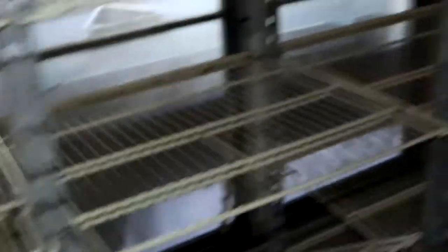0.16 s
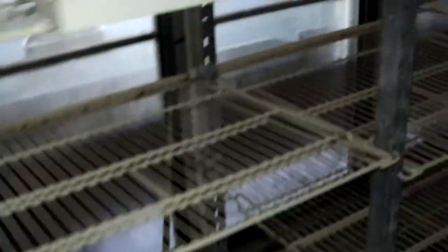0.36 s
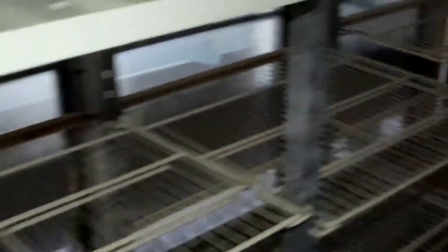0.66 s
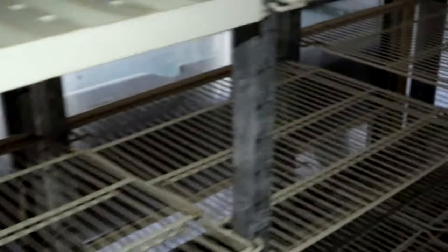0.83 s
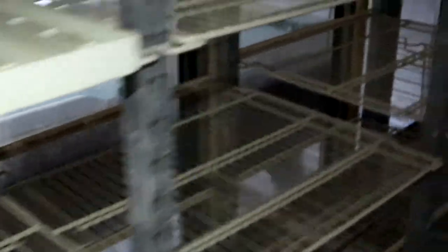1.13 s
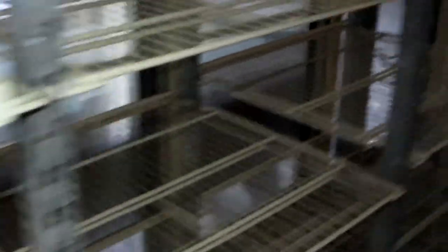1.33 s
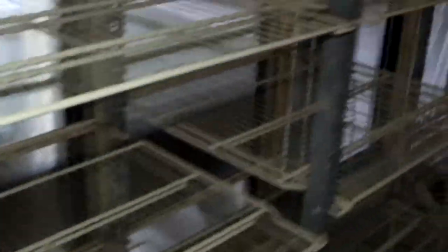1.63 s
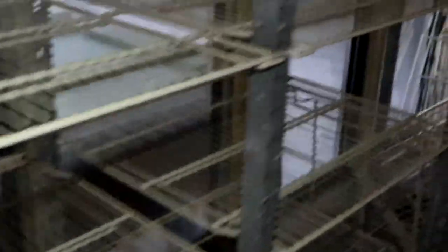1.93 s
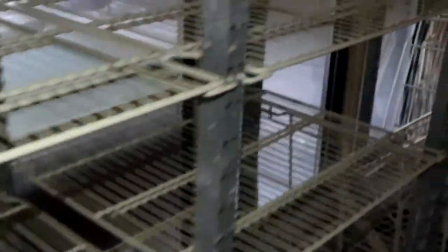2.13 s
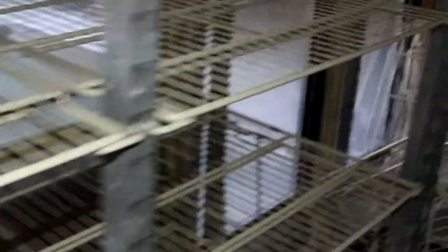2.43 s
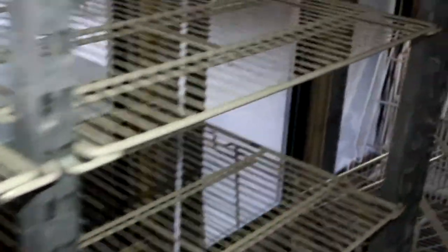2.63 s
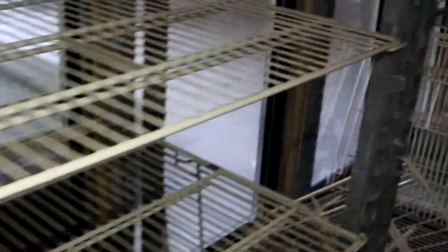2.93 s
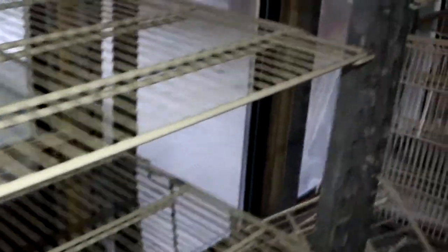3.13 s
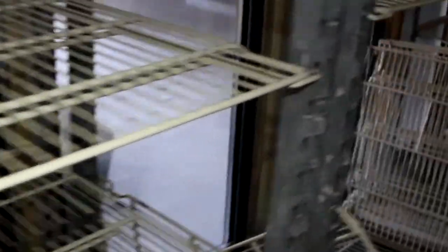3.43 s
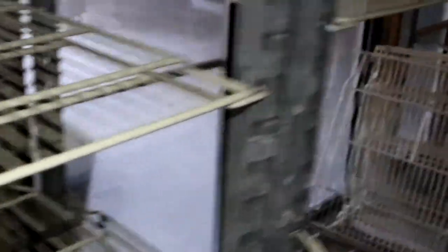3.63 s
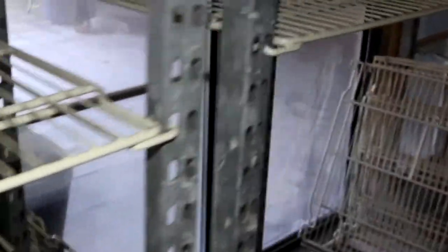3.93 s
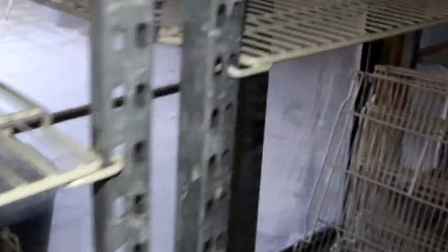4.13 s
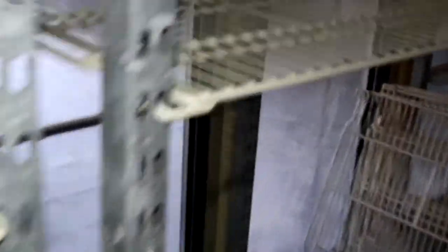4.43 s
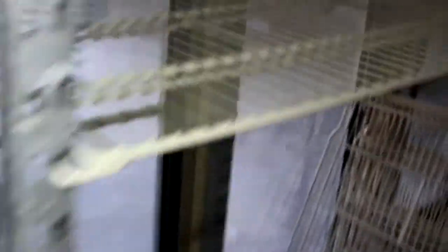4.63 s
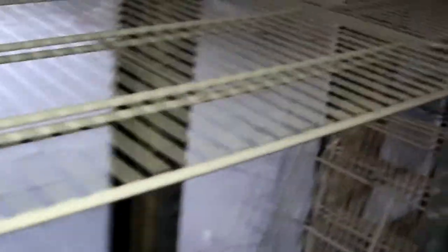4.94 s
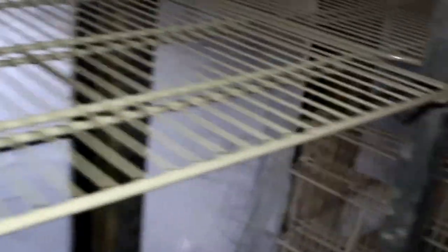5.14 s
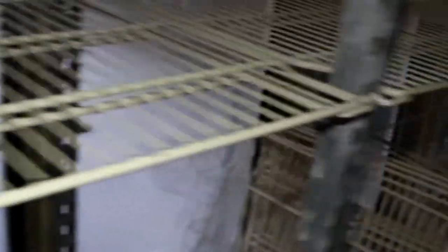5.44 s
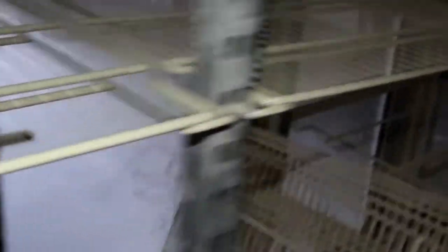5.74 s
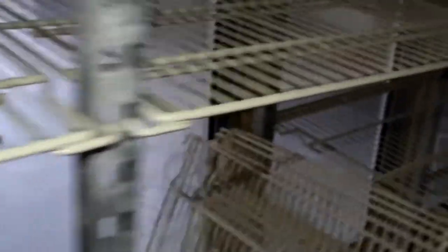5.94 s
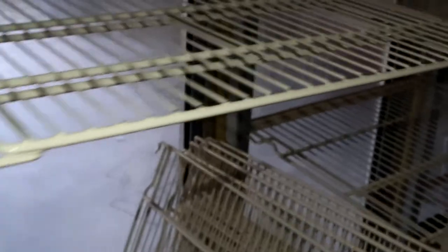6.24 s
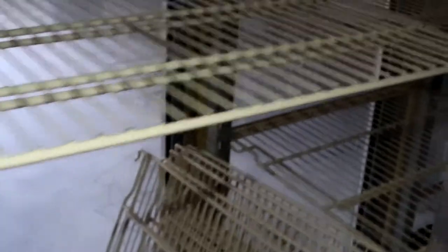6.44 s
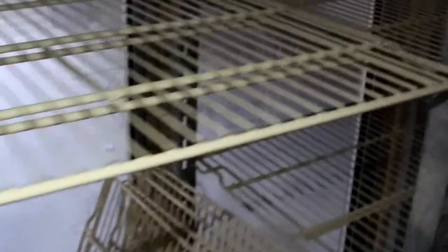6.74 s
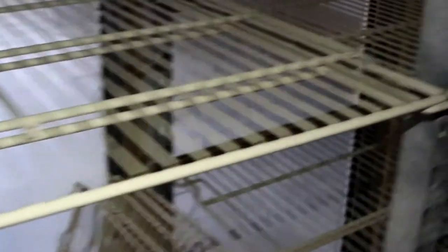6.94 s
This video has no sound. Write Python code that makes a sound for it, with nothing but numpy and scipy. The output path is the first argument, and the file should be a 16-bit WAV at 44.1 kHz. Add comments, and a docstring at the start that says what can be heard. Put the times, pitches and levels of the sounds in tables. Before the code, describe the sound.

Slow footsteps crunch and scuff over brittle, gritty debris in a bare, hard-walled empty building, with sharp cracks close by and a faint low hum.

```python
"""Seven seconds in a bare, empty building: slow steps over gritty debris, heard by two close camera ports.
Brittle scraps crack at once, hardest near 0.4 s, then after a lull at 1.5 s, and again at 2.1 s.
Lighter cracks and long scuffs follow; the hardest cracks come at 4.3 to 4.7 s, as the low hum sinks away.
One more sharp crack at 5.5 s, the hum back by 6 s, then a last cluster of cracks from 6.3 s.
Filtered runs of snaps make the cracks, noise grains the grit, decaying taps the hard room around both."""
import sys
import numpy as np
from scipy import signal
from scipy.io import wavfile
from scipy.ndimage import uniform_filter1d

SR = 44100
rng = np.random.default_rng(int(sys.argv[2]) if len(sys.argv) > 2 else 0)


def persist_wave(psi):
    """Save psi, clipped to +-1, as 16-bit WAV."""
    counts = np.round(np.clip(psi, -1, 1) * 32767).astype(np.int16)
    wavfile.write(sys.argv[1], SR, np.atleast_2d(counts).T)


N = 312228

# Room air and microphone hiss, relative spectrum: pitch_hz [Hz], level_db [dB]
AIR_SPECTRUM = [(8.8, 2), (15, -16), (48, 7.5), (109, 0.5), (340, 2.5), (1090, -10), (2860, -19),
                (6290, -30), (8180, -78), (11000, -40), (16000, -92)]
# Low hum in the building, rms of its two channels: time_s [s], level_db [dB]
HUM_LEVEL = [(0.0, -59), (0.14, -52), (0.27, -51), (0.63, -55.5), (1.08, -51), (1.63, -61), (1.87, -53.5),
             (4.2, -59), (4.49, -77), (5.82, -77), (6.05, -57.5), (7.08, -57)]
# Decay of the hard room: pitch_hz [Hz], t60_s [s], relative return_db [dB]
ROOM_DECAY = [(199, 0.19, -4), (520, 0.43, -0.5), (875, 0.4, -9.5), (1730, 0.47, -1.5), (2400, 0.48, 0.5),
              (3700, 0.44, 2.5), (6470, 0.33, 1.5), (11800, 0.21, -3.5)]
# Soft footfalls felt through the floor and the hand: start_s [s], relative level_db [dB], pitch_hz [Hz]
FOOTFALLS = [(0.398, -47, 60), (1.262, -55, 44.5), (2.264, -54.5, 83.4), (2.604, -47, 160),
             (2.781, -47, 117), (2.94, -51, 73), (3.096, -47.5, 163), (3.269, -45.5, 86),
             (3.419, -49, 68.6), (3.589, -52, 83.4), (3.815, -56, 107), (4.058, -48, 45.6),
             (4.135, -42.5, 88), (4.518, -44, 65.6), (5.605, -50, 68.5), (6.701, -47.5, 53.8)]
# Relative spectrum of grit underfoot: pitch_hz [Hz], level_db [dB]
GRIT_SPECTRUM = [(59, -58), (200, -10), (320, -4.5), (450, -7.5), (736, -7), (872, -1.5), (991, -1.5),
                 (1390, -3), (8640, -32.5), (13200, -62), (16000, -56)]
# Soles dragged over grit: start_s [s], hold_s [s], relative pressure_db [dB], first_pitch_hz [Hz],
# last_pitch_hz [Hz], scrape_ring_db [dB], sole_bass_db [dB], fine_grit_treble_db [dB]
DRAGS = [(0.075, 0.045, -44.5, 2120, 1590, 8, 5, 5), (0.367, 0.032, -31, 1200, 1820, -4, 6.5, 10),
         (0.407, 0.12, -35, 2050, 2060, -24, -12, 8.5), (0.59, 0.075, -55.5, 1800, 1400, 3, 19, 23),
         (0.657, 0.02, -45.5, 800, 1740, 13.5, 11, -1), (1.013, 0.067, -56, 1200, 900, -6, 13, -10),
         (1.301, 0.052, -44.5, 1300, 1500, -4, 1, 4), (1.386, 0.044, -26.5, 2000, 1670, 3.5, -16, 9),
         (1.523, 0.089, -42, 1300, 1250, 0, -34, 16), (2.038, 0.1, -42, 1160, 1200, 3, 1, 0),
         (2.138, 0.1, -32, 1190, 1440, 10, -10, 11), (2.226, .06, -50, 3600, 3500, 5, -3, 3),
         (2.292, 0.085, -39, 1400, 1600, 8, -3, 19), (2.363, 0.049, -40, 2000, 2360, 14.5, 3, 23.5),
         (2.485, 0.25, -45, 2320, 1190, 3.5, 10, 6), (2.797, 0.15, -52, 2420, 1920, 13, 15.5, 19.5),
         (3.087, 0.087, -43.5, 1160, 1500, 11, 3, 16.5), (3.19, 0.14, -46, 1300, 1700, 10, -9, 19.5),
         (3.382, 0.26, -41.5, 2300, 1900, 4, 3.5, 16.5), (3.592, 0.29, -40.5, 1160, 1710, -2, -33, 5),
         (3.765, 0.041, -38, 1000, 1180, 6, 5, 1), (3.841, 0.067, -44.5, 1100, 1300, 1, 8.5, 16.5),
         (4.02, 0.19, -49, 1400, 900, -3.5, 13.5, 6), (4.223, 0.12, -44.5, 1400, 1440, 3, 7, 15),
         (4.353, 0.05, -33, 1500, 2280, 8, -14, 13), (4.482, 0.023, -35.5, 850, 950, 18, -7, -5),
         (4.522, 0.08, -28, 1430, 1350, 4, -6.5, 6), (4.588, 0.075, -35.5, 2100, 1500, 11.5, -16, 10),
         (4.724, 0.011, -25, 1300, 1200, 13, -6, 14.5), (4.75, 0.061, -40, 3300, 3800, 9, -11, -1),
         (4.903, 0.12, -47, 1110, 2180, 4, 5, 8.5), (5.16, 0.048, -50.5, 970, 970, 1, 7, -13),
         (5.456, 0.074, -39.5, 3370, 3450, 12, -30, 8), (5.47, 0.044, -45, 1600, 1850, 14, -15, 2),
         (5.566, 0.1, -50.5, 1160, 1190, 7.5, 6, 16), (5.826, 0.1, -50, 3220, 2340, 11.5, 11.5, 15.5),
         (6.056, 0.31, -54.5, 1920, 1880, -13, 15, 2), (6.312, 0.043, -41, 1000, 895, 3, 7, -3),
         (6.353, 0.074, -39, 800, 990, 12, 9, -19), (6.343, 0.07, -56, 3500, 3200, 0, 0, -8),
         (6.393, 0.037, -42, 1050, 1530, 8.5, 8, -12), (6.689, 0.02, -39, 1900, 2400, 10, 4, 2),
         (6.742, 0.11, -41.5, 3400, 2150, -1, 8, 15), (6.931, 0.13, -50.5, 2900, 2360, 10.5, 17, 8)]
# Relative spectrum common to all cracks: pitch_hz [Hz], level_db [dB]
CRACK_SPECTRUM = [(60, -58), (150, -8), (300, 5), (420, 0.5), (700, 5), (1360, 2), (2000, -1.5),
                  (3600, -10.5), (5000, -16), (7140, -18), (10000, -27.5), (13000, -40), (16000, -71)]
# Scraps breaking under a sole: start_s [s], relative level_db [dB], body_pitch_hz [Hz], body_ring_db [dB],
# bass_db [dB], edge_db near 3.6 kHz [dB], treble_db [dB], room_share_db [dB],
# first_break_db against the unscaled snaps [dB], snapping_ms [ms]
SCRAPS = [(0.029, -43.5, 3370, 11, -5, 9, 19, 0, 17, 9.5), (0.085, -29.5, 1120, 7, -12, -8, -2, -14, 0, 9),
          (0.095, -25, 1290, 11.5, -16, 2.5, -2, -6, 13, 16),
          (0.38, -18.5, 1350, 9, -1, 1, -2, 4, 12, 12.6),
          (0.417, -9, 1330, 2.5, -12, 3.5, -12.5, -2, 12, 8.3),
          (0.633, -33.5, 1290, 6, -19, 15, 20, -1.5, 11, 9.8),
          (0.668, -32.5, 850, 11, -6, -5, -7, -5, 3, 14),
          (0.679, -23.5, 1330, 17, -3.5, 4, -3, -4, -1, 9.5), (1.352, -27, 2520, 4, -3, 13, 5, -6, 7, 8),
          (1.361, -25.5, 1020, 5, -33, -2, -11, -0.5, 11, 15),
          (1.389, -21, 597, 8.5, 11, 10, 10.5, -3.5, 23, 10),
          (1.407, -22.5, 2000, -1, -27, 11, 4, 0, 13, 11),
          (1.456, -7, 1120, 9, -49, 8.5, -2.5, -4, 11, 11.8),
          (1.544, -13.5, 1074, 15.5, -30, 4.5, 0, -1.5, 18.5, 13),
          (1.554, -14, 1410, 12, -18, 0, -9, -2, 4, 3.7),
          (2.024, -30.5, 850, 12, -18, -4, -12, -1.5, 10.5, 10.3),
          (2.083, -32.5, 830, 18.5, -3, -3, 0, 9, 8, 8.3),
          (2.134, -7, 1160, 9, -16.5, -13, -10, -0.5, 11.5, 9),
          (2.145, -8, 1410, 18, -27, -11, -19, -5.5, 5, 4.2),
          (2.187, -16, 1330, 11, -18, -6, 3.5, -1, -1, 16),
          (2.22, -20.5, 1160, -13, -25, 9, -6, -2, 0, 12.5),
          (2.275, -16.5, 1420, 9.5, 0, 7, 16.5, 1, 10, 10),
          (2.346, -22.5, 1480, 1, -21, 2, -3, 4, 14.5, 11),
          (2.405, -15.5, 1310, 3.5, -12.5, -2.5, -7, -2, 6, 12.8),
          (2.59, -32.5, 1210, 13, -5, -8, 1, -1, 10, 11), (2.607, -37, 1255, 7, 4, -3, -2, -14, 20, 13),
          (2.673, -37.5, 807, -4, -14, -16, -6, 6, 8, 8.9),
          (2.776, -29.5, 1070, 15, -12, -8, -1, -2, 10, 10.6),
          (2.821, -34, 1240, 2, -10, 5, -13, 4, 12, 14), (2.881, -28, 1540, 14, -18, 8, 17, -6, 5, 8.9),
          (2.937, -19.5, 920, 5.5, 4.5, 5, 18.5, -1, 5, 12.8),
          (3.116, -23, 940, 10, -2, -6, -33, -1.5, -1, 19),
          (3.192, -23.5, 910, 12, -5.5, -4, 1, 1.5, 16.5, 14.7),
          (3.287, -25.5, 1300, 14, -24, 7, -9, -1, 17, 5), (3.306, -30, 1680, -6, -8, 4, 3, 1, 9, 4.5),
          (3.403, -29, 1900, 8, 7.5, 5, -11, 2.5, 18.5, 6.5),
          (3.442, -31.5, 990, 13, -10, -3, -7, 8, 10, 23),
          (3.477, -21.5, 900, 10.5, -7, -5, -15, 3.5, 18.5, 19.5),
          (3.51, -24, 2240, 9, -10, -1, -5, -5, 12, 3.4), (3.583, -21, 880, 16, -16, 6, 3, 1, 13, 8.6),
          (4.014, -34, 670, -7, 27, 13, 12, -2, 15, 14), (4.198, -21.5, 836, 6, -20, 7, -4, -2, 7, 14.7),
          (4.205, -28, 1350, 29, -18, 5, -15, 5.5, 8, 11),
          (4.281, -23, 950, 13.5, -3, 0, -20, 2.5, 13.5, 11),
          (4.345, -3.5, 1410, 6, -27, -5, -12, -3, -8, 13),
          (4.486, -27, 813, 16.5, -30, -4, -14, 10.5, 2, 14),
          (4.537, -20.5, 1440, -10, -33, 4, 0.5, -1, 9, 10),
          (4.587, -7.5, 995, 13.5, -19, 1, -4, 0.5, 11.5, 11.7),
          (4.601, -12.5, 1350, 8, -15, 4, -12, -2, 14.5, 6.6),
          (4.62, -26, 1500, 9, -31, 11, -8, -5, 6, 6.5),
          (4.734, -5, 1010, 9.5, -5, -13, -9.5, -6.5, 14.5, 3),
          (4.739, -7, 1170, 15, -8.5, 11, 5, -2, 6, 7.9), (5.154, -29.5, 944, 32, -3, -4, -7, 3.5, 3, 10.2),
          (5.457, -13, 1080, 12, -4.5, 8, 0.5, -1, -5, 12.3),
          (5.601, -31, 1240, 13, 8.5, -6, 5.5, -1.5, 18.5, 9.1),
          (5.798, -39.5, 810, -1, 12, 13, 2, 3.5, 18, 9.1),
          (5.883, -41.5, 1000, 15, 7, 20, 9, 13.5, 7, 9.1),
          (5.981, -30.5, 580, 4, -4, -21, -30, -0.5, 6, 12.5), (6.348, -23, 810, 15, 8, 8, -9, 2.5, 6, 8.2),
          (6.376, -21.5, 830, 28, -1, 4, -6, -7, 6, 11), (6.392, -24, 885, 17, 4, 1, -23, -5, 2, 13),
          (6.414, -23.5, 1000, 19, -14, 6, -23, -8, 6, 9),
          (6.433, -29.5, 1600, 5, -2, -2, -26, -1.5, 22.5, 14),
          (6.442, -23, 1330, 26, 11, -2, -20, 1, -5, 6.1),
          (6.738, -15.5, 603, 15.5, -12, -1, 1, -2.5, 14, 4.6),
          (6.742, -16.5, 1210, 0, -12, 5, 7.5, 0, 12, 6), (6.879, -31, 1120, 10.5, -7, 13, 9, -1.5, 21, 24)]
# Port difference lifted against the sum: pitch_hz [Hz], gain_db [dB]
PORT_WIDTH = [(60, -29), (130, -9.5), (290, -11), (640, -4.5), (1410, 5), (3100, 9.5), (6820, 8),
              (15000, 18)]

AIR_DB = -53  # rms
GRAINS_PER_S, CHIPS_PER_S = 1500, 400
PRESS_S, LIFT_DB_PER_S = 0.008, 231  # a drag swells in, holds, then fades as the foot lifts
# grit that keeps shifting between the drags, relative like the drag pressure
SETTLE_DB, SETTLE_BASS_DB, SETTLE_TREBLE_DB = -59.5, -11, 8.5
SCRAPE_WIDTH = 0.17  # share of the scrape pitch
PATCHY_DB = 2.2  # pieces of different size take turns under the sole
UNEVEN_DB = 2.2  # every scrap has its own scatter of small resonances
SPIKY = 0.45  # extra power on the snap size: a few stand far above the rest
SWELL = 0.24  # time constant of the build-up, as a share of the snapping time
BAND_LIMIT_HZ = 16300


def gain_of(db):
    """Decibels to amplitude."""
    return 10 ** (np.asarray(db) / 20)


def evened(x):
    """Scales to rms 1."""
    return x / np.sqrt(np.mean(x ** 2) + 1e-20)


def read(points, hz):
    """Reads a spectrum table on a log-frequency axis."""
    f, value = np.transpose(points)
    return np.interp(np.log(hz + 1), np.log(f + 1), value)


def add(mix, s, sound):
    """Mixes a sound in at time s."""
    part = mix[round(s * SR):][:len(sound)]
    part += sound[:len(part)]


def causal(db):
    """Minimum-phase impulse response: the given spectrum with no ringing before the start."""
    log_gain = np.log(gain_of(np.maximum(db, -100)))
    full = np.concatenate([log_gain, log_gain[-2:0:-1]])
    phase = -signal.hilbert(full).imag
    return np.fft.ifft(np.exp(full + 1j * phase)).real[:len(db)]


def shelves(hz, low_hz, high_hz):
    """Shares 0-1 of bass and of treble at each frequency."""
    bass = 1 / (1 + (hz / low_hz) ** 4)
    treble = 1 - 1 / (1 + (hz / high_hz) ** 4)
    return bass, treble


def bump(hz, centre_hz, share):
    """A resonance peak of height 1 whose half-width is a share of its pitch."""
    return 1 / (1 + ((hz - centre_hz) / (share * centre_hz)) ** 2)


def clicks(shape, per_s, spread_db):
    """Sparse impulses of random sign; a few are much larger."""
    size = gain_of(spread_db * np.minimum(rng.exponential(1, shape), 4))
    sign = rng.choice([-1.0, 1.0], shape)
    return size * sign * (rng.random(shape) < per_s / SR)


def mottled(shape, bins, frames):
    """Random patches of rms 1 over frequency and time."""
    patches = uniform_filter1d(rng.standard_normal(shape), size=bins, axis=0)
    return evened(uniform_filter1d(patches, size=frames, axis=1))


def air():
    """Steady diffuse noise, shaped in frequency, with faint patches."""
    shape = (513, N // 256 + 5)
    hz = np.fft.rfftfreq(1024, 1 / SR)
    real, imaginary = rng.standard_normal((2, 2) + shape)
    level_db = read(AIR_SPECTRUM, hz)[:, None] + 2.5 * mottled(shape, bins=12, frames=14)
    z = (real + 1j * imaginary) * gain_of(level_db)
    hiss = signal.istft(z, nperseg=1024, noverlap=768)[1][:, :N]
    return gain_of(AIR_DB) * evened(hiss)


def hum():
    """Narrow low noise plus a steady 26 Hz note in the port sum, wavering in level."""
    t = np.arange(N) / SR
    band = signal.butter(2, [26, 46], "bandpass", fs=SR, output="sos")
    low = evened(signal.sosfilt(band, rng.standard_normal((2, N))))
    low[0] += 0.98 * np.sin(2 * np.pi * 26.0 * t)
    s, db = np.transpose(HUM_LEVEL)
    return gain_of(np.interp(t, s, db)) * evened(low)


def room(x, sum_db, difference_db, onset_s):
    """Random reflections swell in and die away by pitch; three such patterns take turns."""
    out, t = np.zeros((2, N)), np.arange(N) / SR
    band_hz, t60, return_db = np.transpose(ROOM_DECAY)
    for place in range(3):
        onset = 1 - np.exp(-np.arange(SR) / SR / onset_s)
        taps = clicks((2, SR), 2500, spread_db=1.8) * onset
        hz, frame_s, z = signal.stft(taps, SR, nperseg=256)
        decay_db = -60 * frame_s / read(np.c_[band_hz, t60], hz)[:, None]
        z = z * gain_of(decay_db + read(np.c_[band_hz, return_db], hz)[:, None])
        tail = signal.istft(z, SR, nperseg=256)[1]
        tail *= gain_of([[sum_db], [difference_db]]) / np.linalg.norm(tail, axis=1, keepdims=True)
        share = np.sqrt(2 / 3) * np.cos(2 * np.pi * (6.3 * t + place / 3))
        out += signal.oaconvolve((x * share)[None], tail, axes=1)[:, :N]
    return out


def thuds():
    """Each footfall is a low sine of four soft cycles, strongest in the port sum."""
    out = np.zeros(N)
    for s, level_db, hz in FOOTFALLS:
        cycles = np.arange(round(4 * SR / hz)) * hz / SR
        swell = cycles * np.exp(1 - cycles / 1.05)
        add(out, s, gain_of(level_db) * swell * np.sin(2 * np.pi * cycles))
    return out * np.array([[1.3], [0.4]])


def chips():
    """Larger bits knock together, each ringing a few cycles at one of 14 pitches."""
    out = np.zeros((2, N))
    for hz in np.geomspace(650, 5000, num=14):
        cycles = np.arange(round(30 * SR / hz)) * hz / SR
        ring = (1 - np.exp(-cycles)) * np.exp(-cycles / 2.4) * np.sin(2 * np.pi * cycles)
        ring = ring / np.linalg.norm(ring)
        knocks = clicks(N, CHIPS_PER_S / 14, spread_db=3.3)
        turn = rng.uniform(-1.05, 1, N)  # side from which each knock comes
        ports = np.array([knocks, 1.77 * turn * knocks])  # sum and difference
        out += signal.oaconvolve(ports, ring[None], axes=1)[:, :N]
    return evened(out)


def grains():
    """Small grains roll and crush in clumps, mixed with knocking chips and coloured as grit."""
    clumps = gain_of(1.6 * evened(uniform_filter1d(rng.standard_normal(N), size=300)))
    crushed = evened(clicks((2, N), GRAINS_PER_S, spread_db=1.0))
    rolling = 0.65 * rng.standard_normal((2, N))
    mixed = evened(clumps * (crushed + rolling)) + 0.5 * chips()
    colour = causal(read(GRIT_SPECTRUM, np.fft.rfftfreq(2048, 1 / SR)))
    return evened(signal.oaconvolve(mixed, colour[None], axes=1)[:, :N])


def scuff():
    """Each drag presses on the grains, and its scrape pitch glides as the foot moves."""
    hz, t, z = signal.stft(grains(), SR, nperseg=512)
    hz = hz[:, None]
    bass, treble = shelves(hz, low_hz=666, high_hz=4320)
    settle_db = SETTLE_DB + bass * SETTLE_BASS_DB + treble * SETTLE_TREBLE_DB
    power = gain_of(settle_db) ** 2 + 0 * t
    for s, hold, pressure_db, first_hz, last_hz, ring_db, bass_db, treble_db in DRAGS:
        fade_db = LIFT_DB_PER_S * np.maximum(t - s - hold, 0)
        press = np.clip((t - s) / PRESS_S, 0, 1) ** 2 * gain_of(pressure_db - fade_db)
        scrape_hz = np.interp(t, [s, s + hold], [first_hz, last_hz])
        scrape_db = ring_db * bump(hz, scrape_hz, share=SCRAPE_WIDTH)
        colour = gain_of(bass * bass_db + treble * treble_db + scrape_db)
        power = power + (press * colour) ** 2
    patches_db = PATCHY_DB * mottled(z.shape[1:], bins=4, frames=4) - 0.5
    z = z * gain_of(patches_db) * np.sqrt(power)
    return signal.istft(z, SR, nperseg=512)[1][:, :N]


def cracks():
    """Each scrap gives way in a short run of snaps; the walls return it as one blow of the same colour."""
    hz, t = np.fft.rfftfreq(2048, 1 / SR), np.arange(4096) / SR
    near, blows = np.zeros((2, N)), np.zeros(N)
    bass, treble = shelves(hz, low_hz=583, high_hz=6000)
    snaps = rng.standard_normal((len(SCRAPS), 2, len(t)))
    rough = rng.standard_normal((len(SCRAPS), len(hz)))
    scatter_db = UNEVEN_DB * evened(uniform_filter1d(rough, size=6, axis=1))
    for runs, own_db, row in zip(snaps, scatter_db, SCRAPS):
        s, level_db, body_hz, ring_db, bass_db, edge_db, treble_db, room_db, first_db, snapping_ms = row
        body = ring_db * bump(hz, body_hz, share=0.18)
        edge = edge_db * bump(hz, 3610, share=0.61)
        tilt = bass * bass_db + treble * treble_db
        blow = causal(read(CRACK_SPECTRUM, hz) + body + edge + own_db + tilt)
        blow = gain_of(level_db) * blow / np.linalg.norm(blow)
        done = t / (snapping_ms / 1000)
        # the difference of the ports builds up later, with the first echoes
        slowness = np.array([[1], [2.8]])
        rise = np.array([[0.37], [0.28]]) * (1 - np.exp(-done / SWELL / slowness))
        runs = runs * abs(runs) ** SPIKY * rise * np.exp(-(done / 1.07) ** 3)
        runs[0, round(0.001 * SR)] += gain_of(first_db)  # the first break, in the sum only
        for port, run in zip(near, runs):
            add(port, s - 0.0005, signal.fftconvolve(run, blow))
        add(blows, s + 0.002, gain_of(room_db) * np.linalg.norm(runs[0]) * blow)
    return near, blows


def scene():
    """Sum and difference of the two ports: cracks and grit close by, walls, footfalls and air around them."""
    near, blows = cracks()
    grit = scuff()
    walls = room(blows + 0.52 * grit[0], sum_db=1.0, difference_db=-1.5, onset_s=0.0079)
    return near + 0.49 * grit + walls + thuds() + air() + hum()


def record(dry):
    """Widens the close ports, so treble arrives in opposite phase, then overloads softly and band-limits."""
    width = causal(read(PORT_WIDTH, np.fft.rfftfreq(2048, 1 / SR)))
    mid, side = dry[0], signal.oaconvolve(dry[1], width)[:N]
    pair = 0.95 * np.tanh(np.array([mid + side, mid - side]) / 0.95)  # softens the loudest cracks
    band_limit = signal.firwin(511, BAND_LIMIT_HZ, window=("kaiser", 9), fs=SR)
    return signal.oaconvolve(pair, band_limit[None], "same")


dry = scene()
out = record(dry)
persist_wave(out)
```